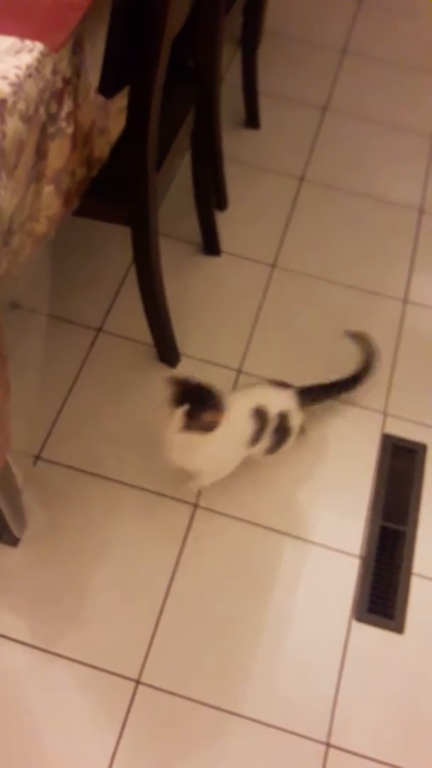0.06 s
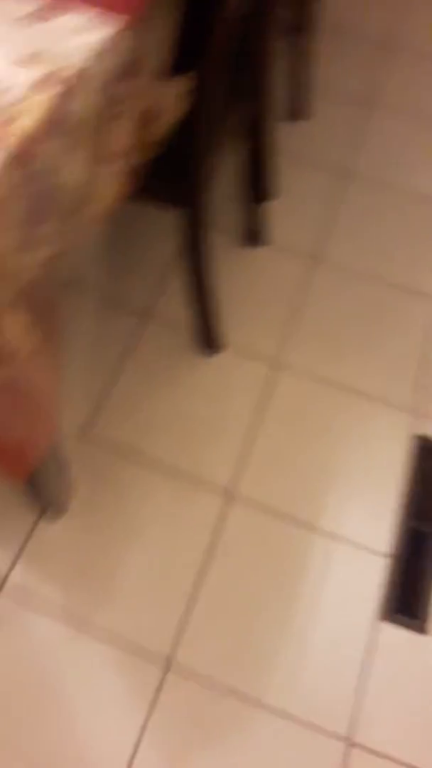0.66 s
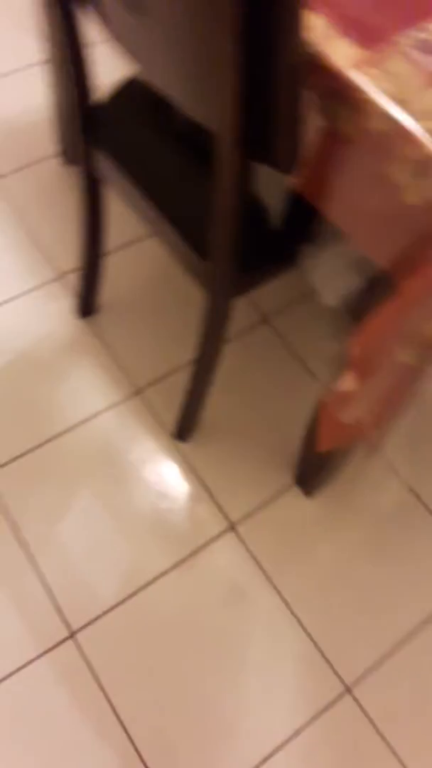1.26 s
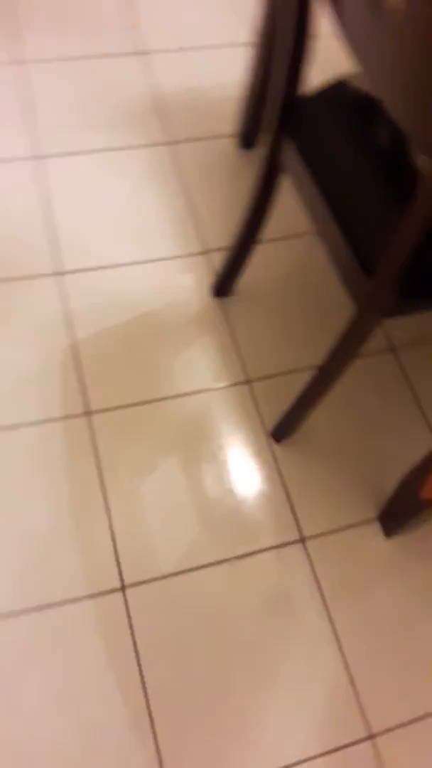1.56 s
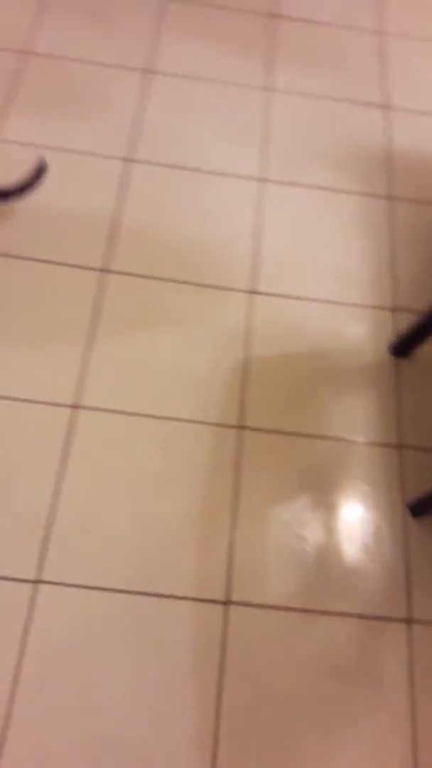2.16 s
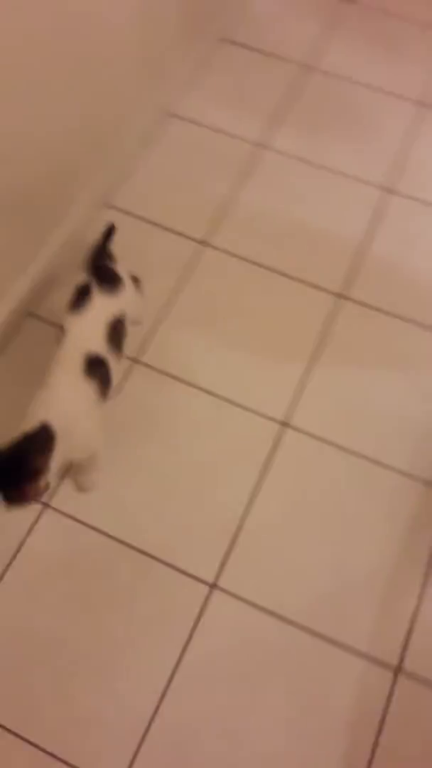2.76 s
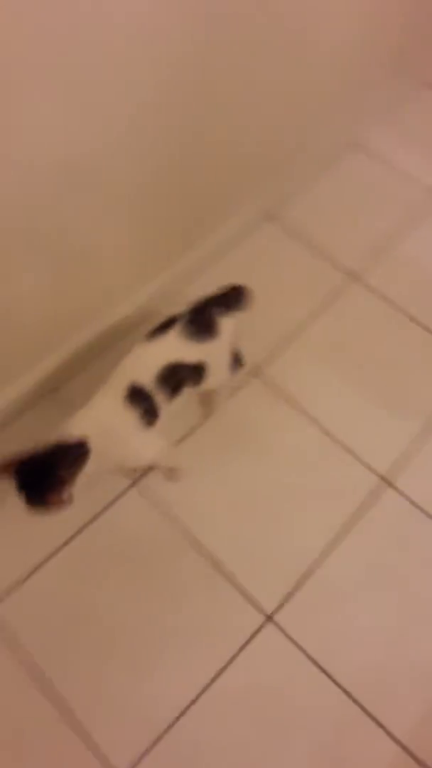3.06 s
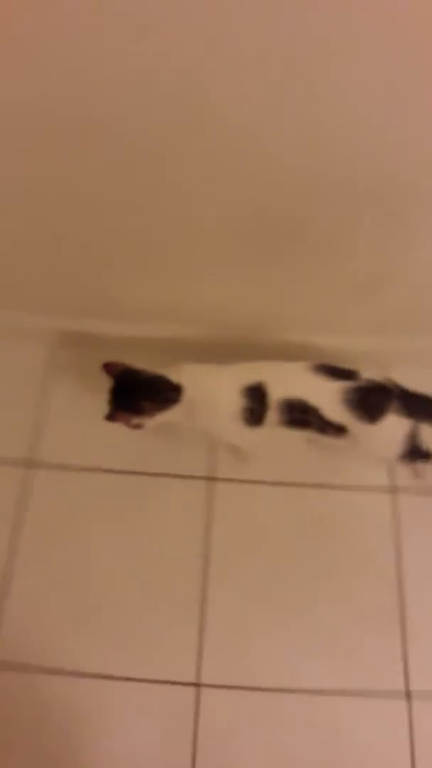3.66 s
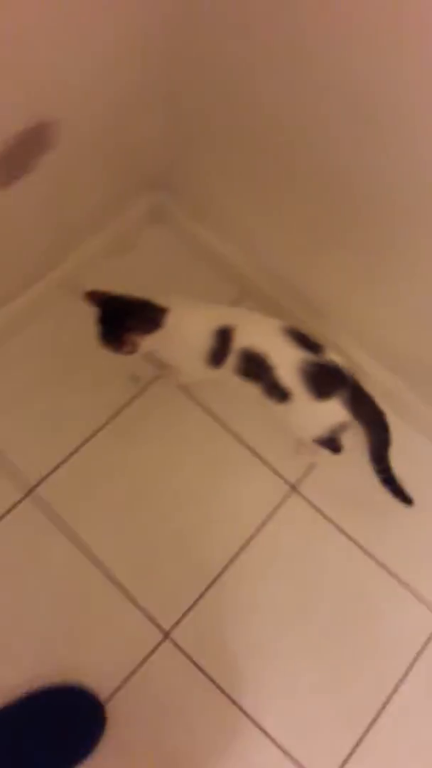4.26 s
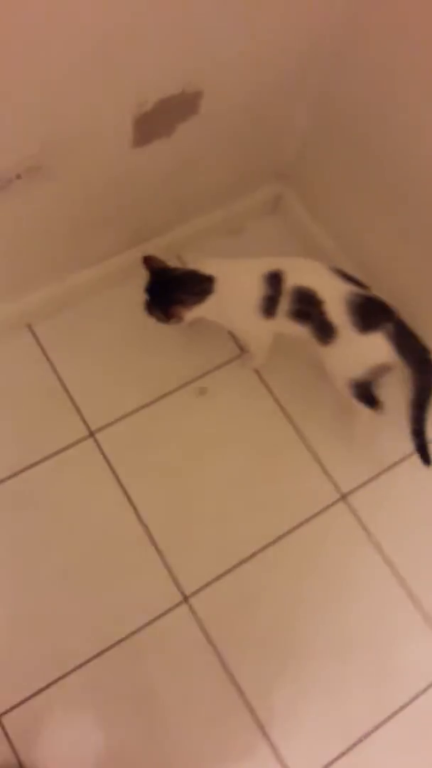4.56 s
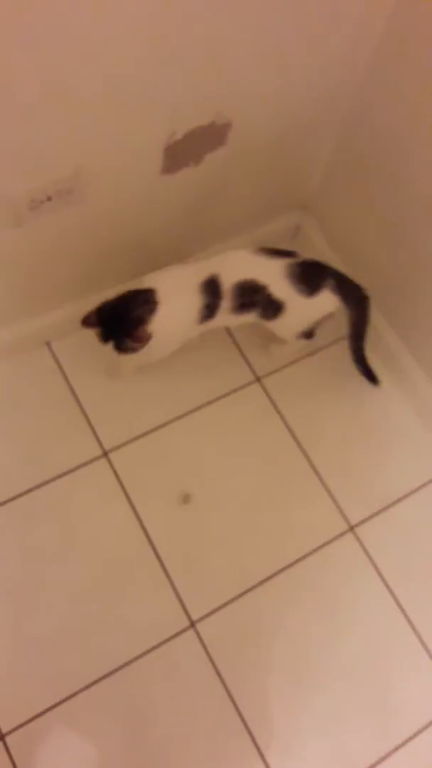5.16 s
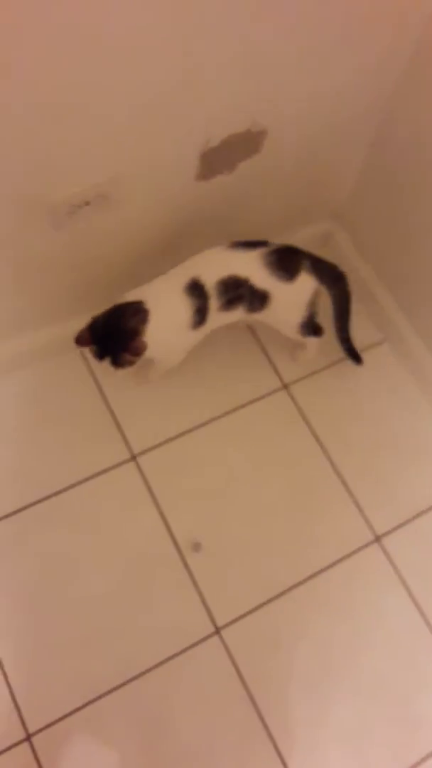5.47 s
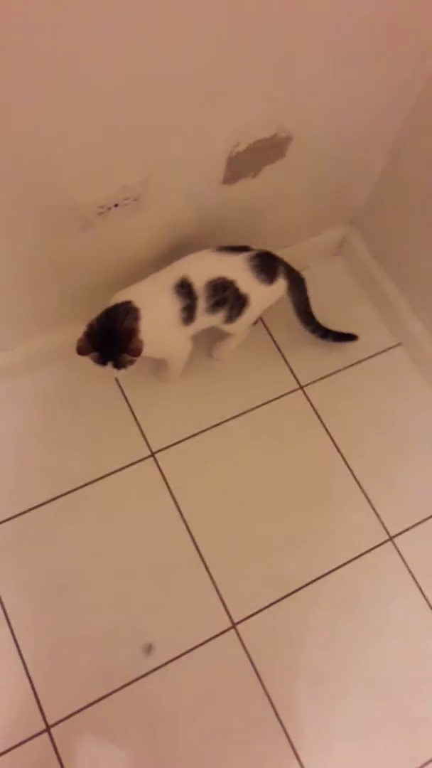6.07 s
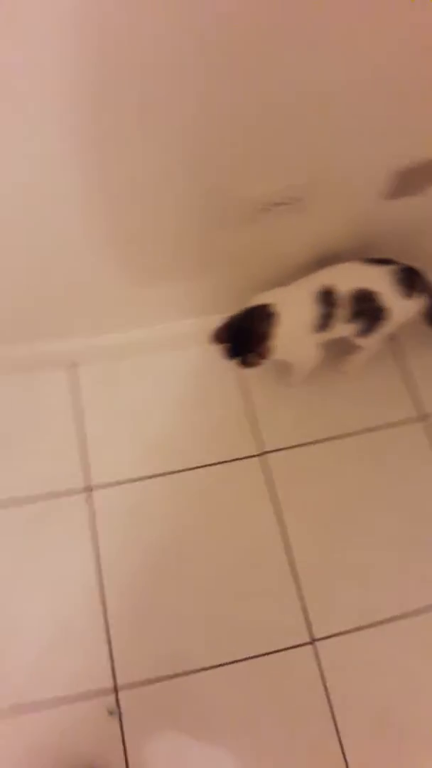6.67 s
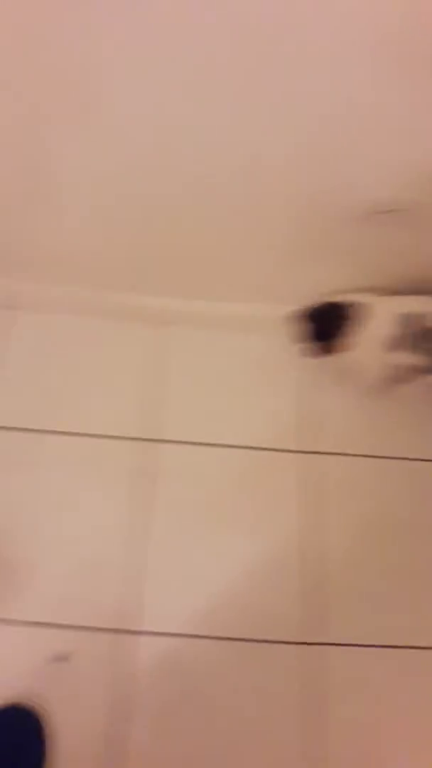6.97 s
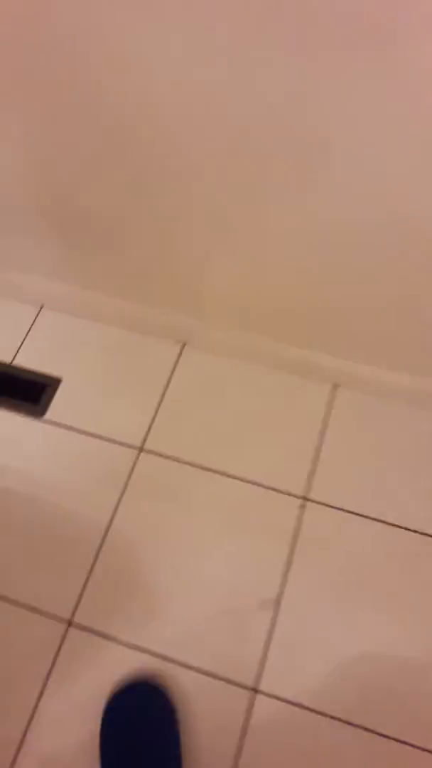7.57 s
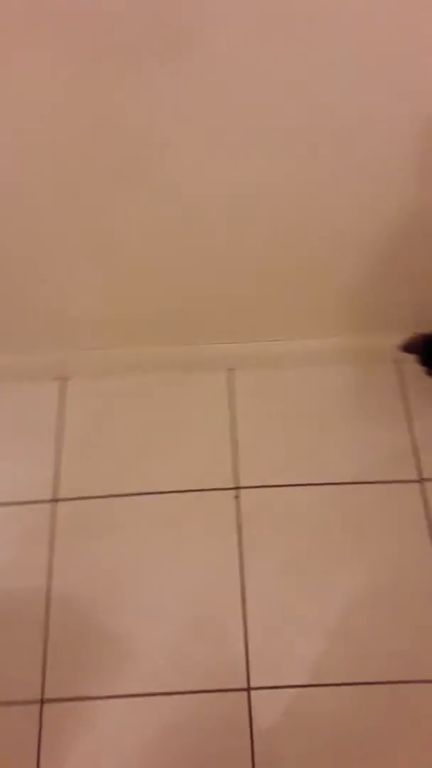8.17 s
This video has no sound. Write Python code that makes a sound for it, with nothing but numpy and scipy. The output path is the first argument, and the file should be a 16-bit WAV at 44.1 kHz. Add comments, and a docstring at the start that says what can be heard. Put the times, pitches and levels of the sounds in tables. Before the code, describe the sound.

In a bare, slightly echoing room with a low hum, a marble rolls and skips over glazed tiles, a little to the left. Its glassy ticks come in quick runs, growing faster and lighter later on, with a faint hiss beneath. It hits the wooden skirting hard three times: early, before the middle and at the end. Someone pads along in slippers with a few soft pats and thuds.

```python
"""Marble on a tiled floor.

A stereo microphone in a bare room, over a low household rumble. A marble hops on the dimpled glaze in
runs of bright ticks, each fluttering between floor and ceiling. It hisses as it rolls and knocks on
the wooden skirting, three times hard. Someone follows in soft slippers."""
import sys
import numpy as np
from scipy import signal
from scipy.fft import rfft, irfft
from scipy.io import wavfile
from scipy.ndimage import uniform_filter1d

SR = 44100
rng = np.random.default_rng(int(sys.argv[2]) if len(sys.argv) > 2 else 0)


def master_out(mix):
    """Clip the mix to full scale and print it as 16-bit PCM to the path in sys.argv[1]."""
    frames = np.transpose(np.atleast_2d(mix))
    ceiling = np.clip(frames, -1, 1)
    pcm = np.round(ceiling * 32767).astype(np.int16)
    wavfile.write(sys.argv[1], SR, pcm)


N = 371763


def amp(db):
    """Decibels to gain."""
    return 10 ** (np.asarray(db) / 20)


def curve_at(points, hz):
    """A table's value at each frequency, joined on a log-frequency axis."""
    f, value = np.transpose(points)
    return np.interp(np.log(hz + 1), np.log(f + 1), value)


def unit_energy(x):
    """Scales a sound to a mean energy of 1 per channel."""
    return x / np.sqrt(np.sum(x ** 2) / len(x) + 1e-20)


def add(mix, s, sound):
    """Mixes a sound in at time s."""
    part = mix[:, max(round(s * SR), 0):][:, :sound.shape[1]]
    part += sound[:, :part.shape[1]]


def bins(size):
    """Frequencies of a real transform."""
    return np.fft.rfftfreq(size, 1 / SR)


def minimum_phase(db):
    """The quickest causal response that has these levels per bin."""
    log_gain = np.log(amp(np.r_[db, db[-2:0:-1]]))
    return np.exp(np.conj(signal.hilbert(log_gain)))[:len(db)]


# Likeness of the room's sound on the two sides of the microphone: (frequency [Hz], coherence [0-1])
COHERENCE = [(60, 0.97), (150, 0.87), (300, 0.94), (600, 0.54), (1200, 0), (4000, 0)]
def diffuse_noise(spectrum, size):
    """Noise of rms 1 reaching the microphone from all round, alike on both sides in the bass."""
    hz = bins(size)
    left, independent = rfft(rng.standard_normal((2, size)))
    coherence = curve_at(COHERENCE, hz)
    right = coherence * left + np.sqrt(1 - coherence ** 2) * independent
    coloured = np.array([left, right]) * amp(curve_at(spectrum, hz))
    return unit_energy(irfft(coloured, size)) * np.sqrt(size)


# Reverberation of the bare room: (frequency [Hz], time to fall 60 dB [s])
ROOM_DECAY = [(150, 0.35), (500, 0.72), (1200, 0.63), (2500, 0.6), (4500, 0.57), (7500, 0.41),
              (12000, 0.35), (16000, 0.32)]
def room_tail(build_s, size=32768):
    """The room's reverberation builds up, then each band dies at its own speed."""
    hz, t, bands = signal.stft(diffuse_noise([(1, 0)], size), SR, nperseg=256)
    decay = np.exp(-np.log(1000) * t / curve_at(ROOM_DECAY, hz)[:, None])
    dying = signal.istft(bands * decay, SR, nperseg=256)[1][:, :size]
    build_up = 1 - np.exp(-np.arange(size) / SR / build_s)
    return unit_energy(dying * build_up)


# Room tone, all round the microphone: (frequency [Hz], spectral level [dB])
AIR_SPECTRUM = [(15, -17), (30, -33), (48, -19), (62, -3.5), (85, -6.5), (105, -10.5), (130, -7),
                (180, -12.5), (230, -6.5), (350, -15), (600, -17.5), (1100, -30), (3000, -58), (16000, -57)]
# An appliance's motor: (frequency [Hz], level [dB])
MOTOR_TONES = [(61, -72.5), (125, -80.5), (226, -68.5)]
def house(air_db=-61):
    """Low air rumble and a wavering motor hum."""
    t = np.arange(N) / SR
    drifts = np.cumsum(rng.standard_normal((len(MOTOR_TONES), N)), axis=1) / np.sqrt(SR)
    hum = sum(amp(db) * np.sqrt(2) * np.sin(2 * np.pi * (hz * t + 0.675 * drift))
              for (hz, db), drift in zip(MOTOR_TONES, drifts))
    return amp(air_db) * diffuse_noise(AIR_SPECTRUM, N) + hum


def panel_blow(spectrum, resonances, bass_db, treble_db, direct_db, spread_s, size=32768):
    """A struck panel: a chirp of bending waves, its ceiling echo and the room, in the panel's colour."""
    t, hz = np.arange(size) / SR, bins(size)
    shape_db = curve_at(spectrum, hz)
    hardness_db = curve_at([(450, bass_db), (1000, 0), (1700, 0), (4300, treble_db),
                            (5600, treble_db), (7500, treble_db / 2)], hz)
    ring_db = sum(db / (1 + (2 * (hz - f) / width) ** 2) for f, width, db in resonances)
    colour = minimum_phase(shape_db + hardness_db + ring_db) / np.sqrt(np.mean(amp(shape_db) ** 2))
    # bending waves travel as the root of frequency, so the treble arrives first
    lag_turns = spread_s * (2 * np.sqrt(1000 * hz) - hz / 4)
    chirp = irfft(np.exp(-2j * np.pi * lag_turns) * amp(curve_at([(3000, -4), (7000, 3)], hz)))
    direct = amp(direct_db) * np.array([chirp, amp(-1) * np.roll(chirp, 2)])
    sound = direct + room_tail(build_s=0.00098)
    add(sound, .0075, amp(-20) * direct)  # off the ceiling
    shudder = amp(-11) * unit_energy(rng.standard_normal((2, size)) * np.exp(-t / 0.011))
    return irfft(rfft(sound + shudder) * colour)


# The floor booms as the walker's weight comes down: (time [s], level [dB])
FLOOR_BOOMS = [(.69, -58.5), (1.25, -63), (3.6, -56), (4.15, -64), (4.45, -64)]
# Soft footfalls: (time [s], level [dB], bass [dB], treble [dB], direct sound [dB])
FOOTFALLS = [(.645, -38, 17, -10, -5), (0.751, -40, 21, -6, -1), (4.125, -10.5, -1, -5, -5),
             (6.362, -22, 0, -3, -1), (6.70, -22, -2, 4.5, -3), (7.463, -12, -6, -4, -2),
             (7.572, -16, 1.5, 0, -17)]
# A slipper on tile: (frequency [Hz], spectral level [dB])
SLIPPER_SPECTRUM = [(60, -40), (150, 1.5), (300, -7), (500, -3.5), (1000, -2.5), (2000, -9), (4000, -8.5),
                    (8000, -19), (16000, -36)]
# A faint high squeak of a sole, then the short, low, hollow notes of two footstep thuds:
# (time [s], length [s], start pitch [Hz], end pitch [Hz], level [dB], overtone slope [dB/octave])
SOLE_TONES = [(0.877, 0.128, 1766, 1697, -62.5, -32), (0.9, 0.23, 1510, 1540, -78, 1.5),
              (7.468, 0.033, 273, 278, -49.5, -20), (7.567, 0.031, 432, 442, -45, -20)]
def slippers(boom_s=.11):
    """Slippers pat the tiles and boom in the floor; one squeaks faintly, two steps thud hollowly."""
    weight = sum(amp(db) * np.exp(-abs(np.arange(N) / SR - s) / boom_s) for s, db in FLOOR_BOOMS)
    out = weight * diffuse_noise([(30, -24), (60, -6), (85, -1), (130, -3), (300, -28), (2000, -82)], N)
    for s, db, *balance in FOOTFALLS:
        add(out, s, amp(db) * panel_blow(SLIPPER_SPECTRUM, [], *balance, spread_s=0.00408))
    for s, length_s, start_hz, end_hz, db, slope_db in SOLE_TONES:
        size = round(length_s * SR)
        waver = 1 + 0.59 * uniform_filter1d(rng.standard_normal(size), 80)  # unsteady pitch
        turns = np.cumsum(np.linspace(start_hz, end_hz, size) * waver) / SR
        tone = sum(amp(slope_db * np.log2(k)) * np.sin(2 * np.pi * k * turns) for k in range(1, 5))
        note = amp(db) * tone * signal.windows.tukey(size, .12)
        add(out, s, np.array([note, note]))
        add(out, s, amp(-6.5) * signal.fftconvolve(note[None], room_tail(build_s=0.004), axes=1))
    return out


# Hiss of the rolling contact, following the marble's speed: (time [s], relative level [dB])
HISS_LEVEL = [(.55, -83.5), (1.05, -71.5), (1.45, -51.5), (1.62, -51), (1.8, -71), (2.05, -50), (2.3, -64),
              (3.4, -49), (5.6, -55.5), (5.87, -71), (6.0, -59.5), (6.1, -71), (6.5, -52), (7.62, -52),
              (8.0, -79), (8.43, -54)]
# Share of the glaze's bright sizzle in that hiss: (time [s], relative level [dB])
SIZZLE_SHARE = [(1.6, -17), (2.3, -1.5), (5.6, -2.5), (6.1, -16), (6.7, -8), (7.3, -6), (7.8, -3)]
# Rumble of the floor under the marble: (time [s], level [dB])
RUMBLE_LEVEL = [(0, -79.5), (1.0, -67.5), (1.2, -54.5), (1.62, -64), (2.3, -56.5), (4.4, -56), (6.0, -63.5),
                (7.6, -57)]
# Colour of that rumble: (frequency [Hz], spectral level [dB])
RUMBLE_SPECTRUM = [(100, -30), (230, 0.5), (330, 2), (500, -8), (800, -4), (1500, -11), (2500, -13),
                   (4000, -21), (8000, -41)]
def rolling():
    """The rolling contact rumbles in the floor and hisses and sizzles in the glaze."""
    hiss_gain, sizzle_gain, rumble_gain = (amp(np.interp(np.arange(N) / SR, *np.transpose(levels)))
                                           for levels in (HISS_LEVEL, SIZZLE_SHARE, RUMBLE_LEVEL))
    grain = amp(28 * uniform_filter1d(rng.standard_normal(N), 120))
    hiss = diffuse_noise([(1500, -19), (3000, -8), (4000, -6), (5700, -3.5), (7400, 4.5),
                          (8200, -9), (11500, -10), (15000, -42)], N)
    sizzle = diffuse_noise([(1500, -28), (3200, -14), (6000, -13), (7400, 2), (8200, -1.5),
                            (12000, -4), (15500, -11), (17000, -33)], N)
    glaze = hiss_gain * grain * (amp(-5) * hiss + sizzle_gain * sizzle)
    return glaze + rumble_gain * diffuse_noise(RUMBLE_SPECTRUM, N)


# Glass on wood: (frequency [Hz], spectral level [dB])
WOOD_SPECTRUM = [(100, -38), (250, -17.5), (500, -10), (800, -4.5), (1200, 2.5), (1900, -3), (2900, -6.5),
                 (4000, -13), (5500, -19.5), (7400, -18.5), (8300, -32.5), (12000, -41.5), (16000, -52)]
# Resonances of the skirting board and its wall: (frequency [Hz], width [Hz], lift [dB])
BOARD_MODES = [(843, 22, 6.5), (920, 16, 4.5), (1117, 25, 3), (1185, 19, 4), (1256, 24, 4.5),
               (1528, 21, 3.5), (1784, 27, 2), (1880, 25, 4.5), (1964, 33, 6), (2096, 29, 4.5),
               (2410, 40, 5.5), (3160, 58, 7), (3520, 80, 6), (5500, 220, 4.5)]
# Knocks at the foot of the wall: (time [s], level [dB], bass [dB], treble [dB], direct sound [dB],
# resonance the spot excites [Hz], its gain [dB], resonance with a node there [Hz], its gain [dB])
SKIRTING_HITS = [(1.161, -17.5, -10, -18, -5, 2140, 15, 850, 3),
                 (1.214, -12, -7, -15, -0.5, 2270, 11, 825, 0), (1.379, -1, 0.5, -7, -15, 2530, 8, 910, -7),
                 (1.529, -7, 9, -6.5, -10, 634, 6, 1630, -3.5),
                 (1.89, 14, -3.5, -2.5, -5, 1133, -1, 1005, -4.5),
                 (3.61, 5.5, -0.5, 15, -3.5, 1810, 8.5, 1120, -11),
                 (3.6254, -2, -5, 12.5, 5, 930, 8.5, 2660, -34),
                 (8.2287, 9, 3.5, -1.5, 2, 2225, 7, 750, -5)]
def skirting_knocks(peak_width_hz=170, node_width_hz=220):
    """The marble hits the skirting; each spot favours one resonance and misses another."""
    out = np.zeros((2, N))
    for s, db, *balance, peak_hz, peak_db, node_hz, node_db in SKIRTING_HITS:
        modes = [*BOARD_MODES, (peak_hz, peak_width_hz, peak_db), (node_hz, node_width_hz, node_db)]
        add(out, s, amp(db - 1.5) * panel_blow(WOOD_SPECTRUM, modes, *balance, spread_s=0.002386))
    return out * amp([[.7], [-.7]])  # a little left of the microphone


# Glass on glazed tile: (frequency [Hz], spectral level [dB])
GLASS_SPECTRUM = [(300, -18), (1500, -20), (3000, -16), (4500, -11), (6000, -7), (6900, 1), (7500, 3),
                  (8200, -7), (9000, -4), (12000, -6.5), (15500, -13), (17000, -33)]
# A light hop rings mostly near the marble's main note: (frequency [Hz], change [dB per dB of lightness])
LIGHT_HOP_COLOUR = [(1500, -0.87), (3200, -0.01), (4500, 0.24), (5600, 0.4), (7300, 0), (10000, -0.04),
                    (16000, -0.5)]
def tick(db, chatter_s=0.00035, chatter_db=-1, size=512):
    """One clean tap of glass on glaze and its brief chatter."""
    t, hz = np.arange(size) / SR, bins(size)
    chatter = rng.standard_normal((2, size)) * (t / chatter_s) * np.exp(-2 * t / chatter_s)
    tap = amp(chatter_db) * unit_energy(chatter)
    tap[:, 0] += 1  # the clean impact
    contact = rfft(tap)
    contact /= np.sqrt(abs(contact) + 1e-9)  # chatter spreads a tap in time but hardly colours it
    lightness_db = np.clip(-5.5 - db, 0, 20)
    colour_db = curve_at(GLASS_SPECTRUM, hz) + lightness_db * curve_at(LIGHT_HOP_COLOUR, hz)
    ring = irfft(contact * minimum_phase(colour_db))
    fade = 1 - np.arange(size) / size
    return amp(db) * unit_energy(ring * fade)


# Runs of hops across the tiles: (start [s], hops [count], first flight [s], change per hop [s],
# force [dB], ceiling echo [dB], left over right [dB])
HOP_RUNS = [(1.113, 1, .014, 0, -5.5, -10, 1), (2.127, 1, .074, 0, -3.5, -1, 2),
            (2.2013, 3, .078, -.0009, 1.3, -3.5, 3.5), (2.4448, 3, .0911, -.006, .5, -2.5, 3.5),
            (2.7057, 7, .0932, -.00224, .6, -2.5, 1), (3.3254, 3, .1024, .0039, -3, -4, 2),
            (3.7201, 6, .0772, .00045, -.7, -6, 4), (4.1773, 6, .0632, -.0001, .4, -6, 4),
            (4.5626, 14, .0662, -.00081, 0, -3, 3.5), (5.4171, 6, .0621, .00102, 1, -6.5, 1.5),
            (5.922, 10, .013, 0, -5, -4, 2), (6.1154, 4, .0117, 0, -1.5, -8, 1.5),
            (6.1677, 9, .0163, -.00066, -1, -6.5, 1), (6.3018, 4, .012, .0016, -1, -7, 1),
            (6.3665, 5, .0314, -.00294, -1.5, -7, 2), (6.5007, 11, .0287, -.00035, -.5, -6.5, .5),
            (6.8166, 9, .028, .00111, -1, -8, 2), (7.1111, 12, .0349, -.00084, -2, -7, 2),
            (7.4688, 7, .0399, -.00364, -.5, -6, 2), (7.6894, 1, .087, 0, -5.5, -6, 1),
            (7.776, 7, .0777, -.0045, -.5, -6, 1), (8.3124, 1, .083, 0, 0, -4, 1)]
def landings(db_per_doubling=7, dimple_db=.5, echo_scatter_db=3, stumble_s=.0028, low_hop_s=.016):
    """Flights lengthen or shorten through a run, and a longer flight lands harder."""
    for s, count, first_s, change_s, force_db, echo_db, pan_db in HOP_RUNS:
        for k in range(round(count)):
            flight_s = max(first_s + k * change_s, .005)
            late, hard, echo_scatter = rng.standard_normal(3)
            db = force_db - 7 + db_per_doubling * np.log2(flight_s / .1) + dimple_db * hard
            # the dimples upset the timing of the lowest hops
            late_s = late * stumble_s * np.exp(-flight_s / low_hop_s)
            yield s + late_s, db, echo_db + echo_scatter_db * echo_scatter, pan_db
            s += flight_s


# The marble's path, nearer to and farther from the microphone:
# (time [s], nearness [dB], ceiling echo delay [s], left channel lag [s])
MARBLE_PATH = [(2.1, -5.5, 0.01, -0.0012), (2.85, 1.5, 0.0071, .000135), (3.3, 0.5, .008, -.00002),
               (4.8, 1.5, 0.0076, -.00002), (5.7, -0.5, 0.0072, .0001), (6.5, 3.5, 0.0086, .00017),
               (7.35, 3, .0093, .00017), (7.749, 2, 0.009, .00011), (8.3, 1, .0072, -.00003)]
def marble_hops(direct_db=1.5, rattle_db=-14, flutter_db=-11, trip_loss_db=5, round_trip_s=.015):
    """Each tick reaches the microphone directly, off the ceiling, and after two floor-ceiling trips."""
    out = np.zeros((2, N))
    sends = np.zeros((4, 2, N))  # the marble moves on, so successive ticks stir the room differently
    path_s, *path_columns = np.transpose(MARBLE_PATH)
    for k, (s, force_db, echo_db, pan_db) in enumerate(landings()):
        near_db, ceiling_s, lag_s = (np.interp(s, path_s, column) for column in path_columns)
        db = force_db + near_db
        pan = amp([[pan_db / 2], [-pan_db / 2]])
        chatter_db = 7.5 + .5 * db  # hard hops chatter more
        direct = pan * amp(direct_db) * tick(db, chatter_s=0.00085, chatter_db=chatter_db)
        add(out[:1], s + lag_s, direct[:1])
        add(out[1:], s, direct[1:])
        add(out, s + rng.uniform(.0011, .0029), pan * amp(rattle_db) * tick(db))
        add(out, s + ceiling_s, pan * amp(echo_db) * tick(db, chatter_s=0.00062, chatter_db=3.5))
        for trip in range(2):
            gain = pan * amp(flutter_db - trip * trip_loss_db + rng.standard_normal())
            add(out, s + (trip + 1) * round_trip_s, gain * tick(db, chatter_db=27))  # scattered
        # the room is as loud whether the marble is near or far
        add(sends[k % len(sends)], s, amp(-near_db) * tick(db, chatter_db=-5))
    room = sum(signal.fftconvolve(send, room_tail(build_s=0.0057), axes=1)[:, :N] for send in sends)
    return amp(-1) * (out + room * amp([[.8], [-.8]]))


def scene():
    """Marble, slippers and house at the microphone, all leaning slightly left."""
    return marble_hops() + skirting_knocks() + slippers() + (rolling() + house()) * amp([[.4], [-.4]])


def record(dry, edge_hz=16700):
    """The recorder's band limit."""
    lowpass = signal.firwin(255, edge_hz, window=("kaiser", 9), fs=SR)
    return signal.oaconvolve(dry, lowpass[None], "same")


dry = scene()
out = record(dry)
master_out(out)
```